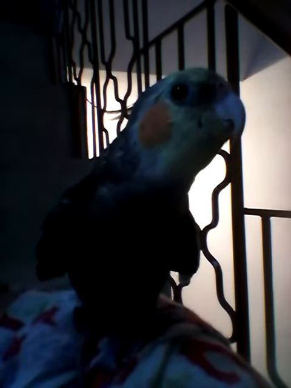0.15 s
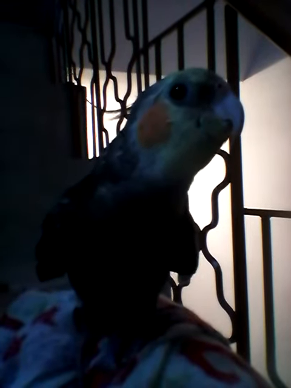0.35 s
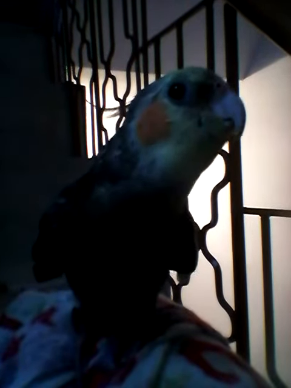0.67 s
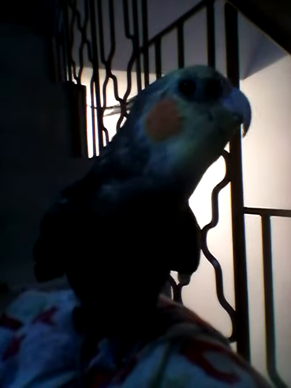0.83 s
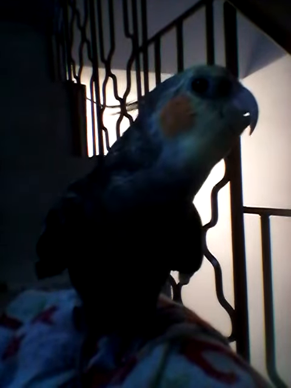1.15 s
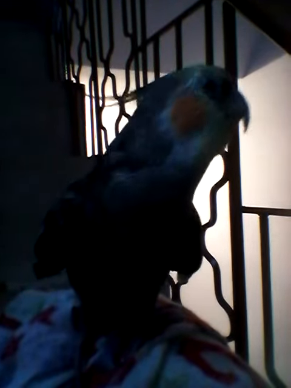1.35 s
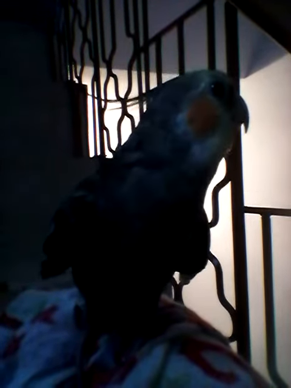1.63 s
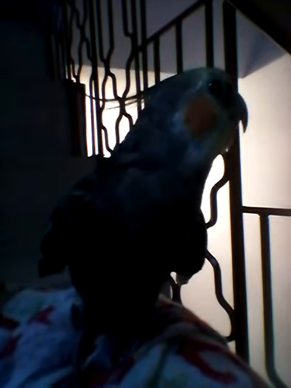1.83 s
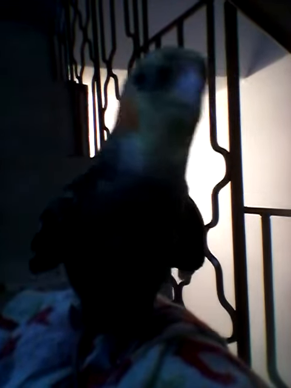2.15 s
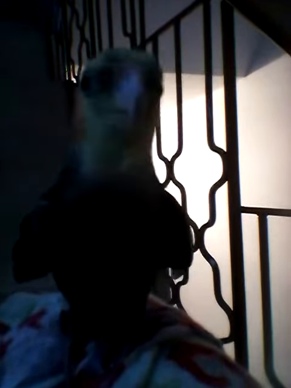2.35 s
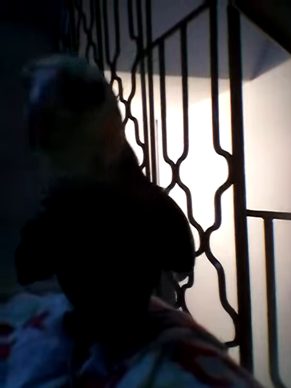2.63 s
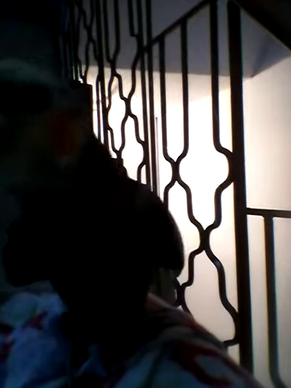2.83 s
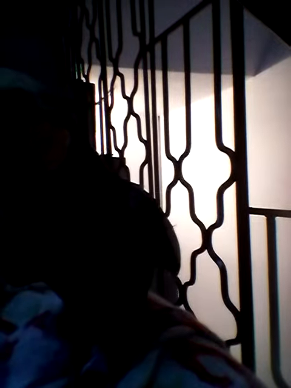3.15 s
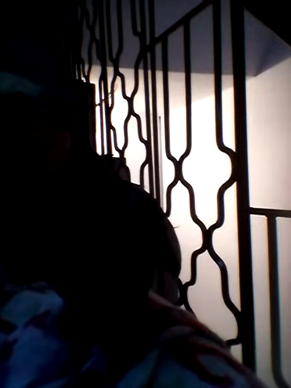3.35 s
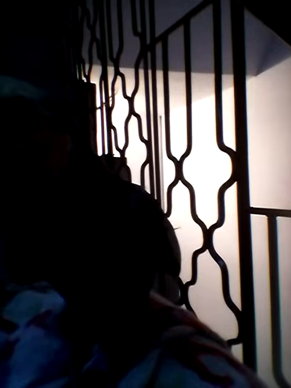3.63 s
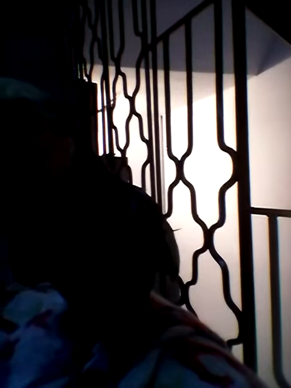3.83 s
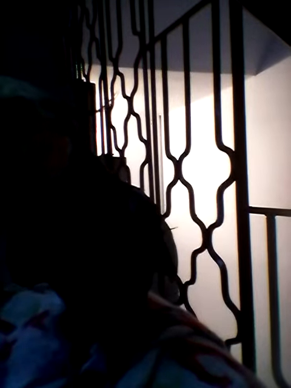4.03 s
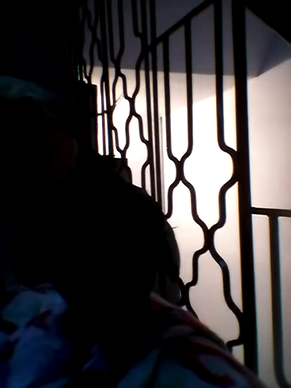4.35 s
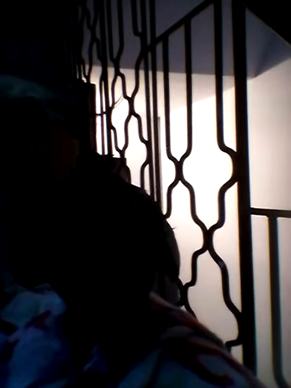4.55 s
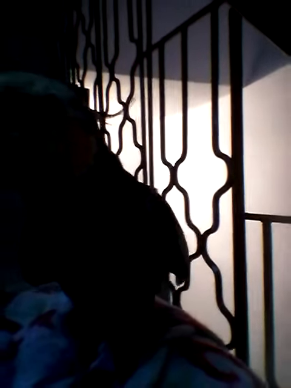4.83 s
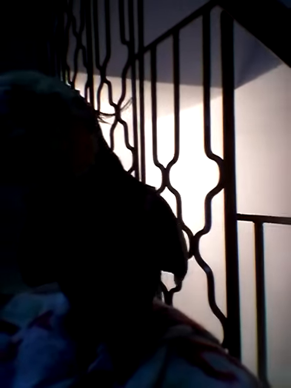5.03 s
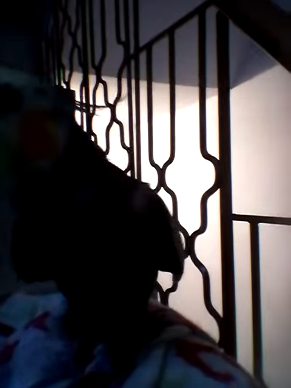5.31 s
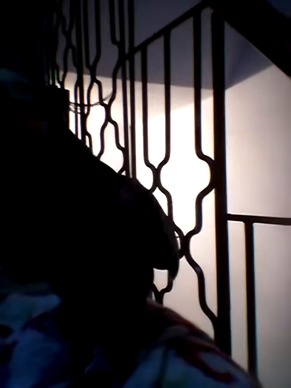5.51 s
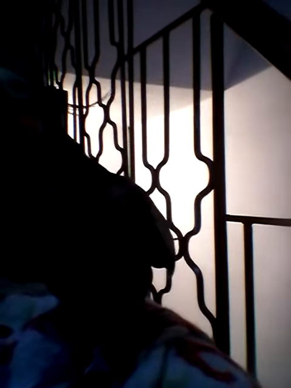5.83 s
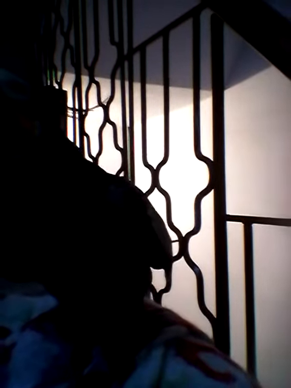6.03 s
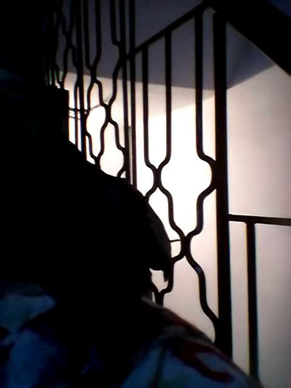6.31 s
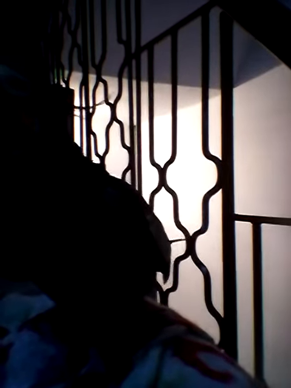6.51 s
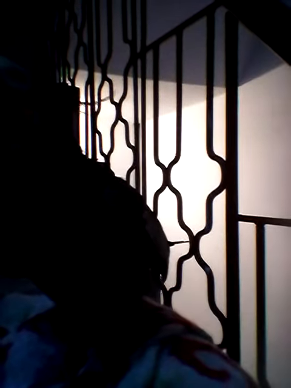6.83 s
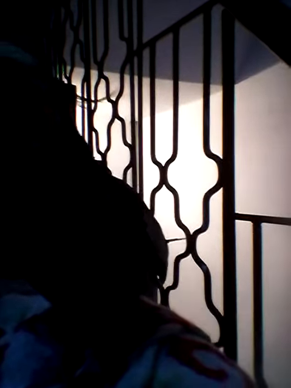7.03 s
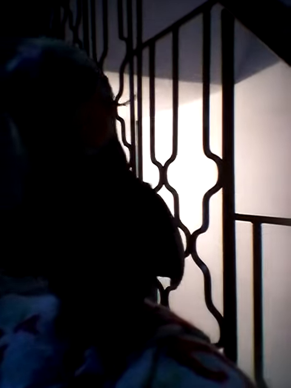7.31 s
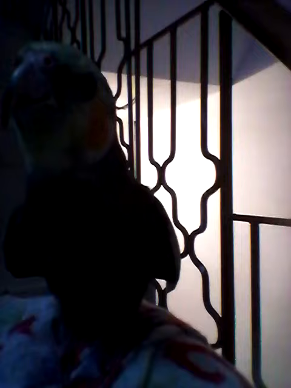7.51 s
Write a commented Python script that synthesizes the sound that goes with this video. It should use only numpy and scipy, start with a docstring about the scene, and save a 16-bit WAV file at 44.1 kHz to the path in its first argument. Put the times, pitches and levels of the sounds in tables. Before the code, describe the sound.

A constant low-level hiss, thin in the bass, fills a hard, echoing stairwell. At 0.7 s a cockatiel close to a small microphone whistles a clear note, sweeping up fast and holding about a quarter second with a wavering, flickering level. A quick rising chirp follows at 1.15 s, then a slightly higher held note from 1.4 to 1.75 s. Near 1.9 s come two faint thin squeaks, a chirp and a brief bright wash of noise. Chirps at 2.2, 2.5 and 2.8 s swoop up and hook down. Two lower, softer held notes run from 3.05 to 3.8 s. Echoes fade into hiss until 5.05 s, when a held note starts a second run: chirp at 5.5, a higher held note at 5.8, chirps at 6.3, 6.55 and 6.8, and a strong held note from 7.1 to 7.5 s. Airy puffs mark many openings; the loudest notes sound slightly overloaded.

```python
"""A steady hiss fills a hard-walled stairwell; from 0.67 s a cockatiel whistles close to a small microphone.
Notes are near sines with weak overtones and half-pitch lines: first a held one, from 1.15 s short rising chirps too.
Puffs of noise join many openings, and the walls answer with dying echoes. Two thin squeaks come near 1.9 s, with
a bright wash of noise around the second. After a gap near 4 s more notes follow, until about 7.5 s. The
microphone port resonates on the hiss, and the loudest notes overload the input."""
import sys
import numpy as np
from scipy import signal
from scipy.fft import rfft, irfft
from scipy.io import wavfile
from scipy.ndimage import uniform_filter1d

SR = 44100
rng = np.random.default_rng(int(sys.argv[2]) if len(sys.argv) > 2 else 0)


def linear_from_db(decibels):
    """Turn decibels (scalar or array-like) into linear amplitude factors; 0 gives 1."""
    return 10 ** (np.asarray(decibels, float) / 20)


def generate_wav(signal):
    """Clip the signal to [-1, 1] and save it as 16-bit WAV at the path in sys.argv[1]."""
    frames = np.transpose(np.atleast_2d(signal))
    scaled = np.clip(frames, -1, 1) * 32767
    pcm = np.round(scaled).astype(np.int16)
    wavfile.write(sys.argv[1], SR, pcm)


N = 338247   # length in samples
EDGE_S = 0.005   # a note swells in and stops within this time


def rms_one(x):
    """Scale to rms 1."""
    return x / np.sqrt(np.mean(x ** 2) + 1e-20)


def at_hz(points, hz):
    """Read a table of frequency and value, evenly spaced in octaves between its points."""
    table_hz, values = np.transpose(points)
    return np.interp(np.log(hz), np.log(table_hz), values)


def drift(rate_hz, count):
    """Slow random wandering of spread 1: white noise twice through a one-pole low-pass."""
    r = np.exp(-2 * np.pi * rate_hz / SR)
    noise = rng.standard_normal(count + 4000)
    settled = signal.lfilter([1], [1, -2 * r, r * r], noise)[4000:]
    return rms_one(settled)


def resonance(x, hz, width_hz):
    """Two-pole band-pass with gain 1 on top."""
    r = np.exp(-np.pi * width_hz / SR)
    poles = [1, -2 * r * np.cos(2 * np.pi * hz / SR), r * r]
    return signal.lfilter((1 - r * r) / 2 * np.array([1, 0, -1]), poles, x)


# Tone colour of the house hiss before the microphone.
# Each row: frequency in Hz, density in dB per Hz relative to the other rows.
HISS_COLOUR = [(60, -17), (120, -4), (200, -11), (350, 4), (700, -1.5), (1300, -5.5), (2300, -13.5),
               (4200, -15.5), (5500, -14), (6900, -12), (7400, -22), (9700, -25.5), (11000, -15),
               (15500, -23)]


def hiss():
    """Broadband noise of the house: white noise shaped in frequency, its level wandering slightly."""
    hz = np.maximum(np.arange(N // 2 + 1) * SR / N, 1)
    spectrum = rfft(rng.standard_normal(N)) * linear_from_db(at_hz(HISS_COLOUR, hz))
    steady = irfft(spectrum, N)
    level_db = -49 + 0.13 * drift(1.0, count=N)
    return linear_from_db(level_db) * rms_one(steady)


def shaped(start, low_hz, bend, steady, fall_hz):
    """Rows (s, Hz, dB) of a whole note: soft opening, bending rise, steady part, closing hook."""
    open_s, open_db, linger_below_hz = 0.017, -17.5, 1900   # the syrinx starts soft, lingers on a low opening
    swell = 1.22   # level follows the rise in pitch
    fall_s, fall_db = 0.018, -8.5   # the closing hook
    (top_s, top_hz, top_db), (end_s, end_hz, end_db) = steady[0], steady[-1]
    u = np.linspace(0, 1, 12, endpoint=False)
    span_hz = max(top_hz - low_hz, 1)
    left = (1 - u) ** bend   # share of the rise still to come
    linger_s = open_s * np.clip((linger_below_hz - low_hz) / 300, .1, 1)
    lift_s = min(start + linger_s, top_s - EDGE_S)
    rise_hz = top_hz - left * span_hz
    rise_db = top_db + open_db * left ** swell * np.sqrt(span_hz / 700)   # wide rises start softer
    rise = np.transpose([lift_s + u * (top_s - lift_s), rise_hz, rise_db])
    hook = [(end_s + fall_s * v, end_hz - fall_hz * v * v, end_db + fall_db * v) for v in (.5, 1)]
    return [(start, low_hz, rise[0, 2] - 10), *rise, *steady, *hook]


# Second partial before the beak. Each row: pitch in Hz, level over the fundamental in dB.
SECOND_PARTIAL = [(1500, -26.5), (1750, -19.5), (2050, -19.5), (2200, -33.5), (2350, -35.5), (2480, -36.5),
                  (2600, -28), (2800, -32), (3100, -27.5)]
# Third to ninth partial before the beak. One number each: level over the fundamental in dB.
UPPER_PARTIALS = [-30.5, -40, -41.5, -47, -42, -41, -41.5]
# How strongly the beak passes the overtones. Each row: frequency in Hz, gain in dB.
BEAK_GAIN = [(3000, 2), (4000, -3), (5200, -9), (6100, -12.5), (6800, -27.5), (7600, -18.5), (8600, -9),
             (10000, 0), (12000, -5), (14000, -1.5), (16000, -4)]
# Tone colour of the half-pitch lines. Each row: frequency in Hz, gain in dB.
HALF_LINE_GAIN = [(800, -22), (1000, -20), (1250, -6.5), (1550, -20), (2450, -2.5), (3000, -17.5),
                  (3750, -13), (4050, -27), (4600, -25.5), (6500, -26)]


def note(rows, half_db, rasp_db, overtones_db):
    """One whistled note: partials on a wavering pitch, with half-pitch lines where every second cycle differs."""
    jitter, shimmer_db = 0.0033, 2.0   # spread of the pitch as a share, of the slow flicker in dB
    low_reedy_db_per_oct = 12.5   # lower notes carry stronger upper partials
    half_held_db, half_fades = -52, 0.29   # half-pitch lines once the top is reached; curve toward it
    s, *columns = np.transpose(rows)
    t = np.arange(int(s[0] * SR), int(s[-1] * SR)) / SR
    # rounding the corners of the pitch and level lines
    hz, first_db = [uniform_filter1d(np.interp(t, s, c), size=260, mode="nearest") for c in columns]
    second_db = first_db + at_hz(SECOND_PARTIAL, hz) + overtones_db
    reedy_db = overtones_db + low_reedy_db_per_oct * np.log2(2500 / hz.max())
    climb_left = (hz.max() - np.maximum.accumulate(hz)) / (hz.max() - hz[0] + 1)
    half_db = half_held_db + (half_db - half_held_db) * climb_left ** half_fades
    wavering_hz = hz * (1 + jitter * drift(77.0, count=len(t)))
    phase = 2 * np.pi * np.cumsum(wavering_hz) / SR

    tone = linear_from_db(first_db) * np.sin(phase)
    second_db = second_db + at_hz(BEAK_GAIN, 2 * hz) + 2.6 * drift(40.0, count=len(t))
    tone += linear_from_db(second_db) * np.sin(2 * phase)
    for k, upper_db in enumerate(UPPER_PARTIALS, start=3):
        uneven_db = shimmer_db * drift(25.0, count=len(t)) + 4.5 * drift(300.0, count=len(t))
        partial_db = first_db + reedy_db + upper_db + uneven_db + at_hz(BEAK_GAIN, k * hz)
        in_range = k * hz < .45 * SR
        tone += linear_from_db(partial_db) * in_range * np.sin(k * phase)
    for multiple in (0.5, 1.5, 2.5):   # the half-pitch lines are randomly uneven in level
        uneven_db = 6.0 * drift(25.0, count=len(t))
        line_db = half_db + at_hz(HALF_LINE_GAIN, multiple * hz) + uneven_db
        tone += linear_from_db(line_db) * np.sin(multiple * phase)

    # turbulence shakes the airflow: noise skirts on each partial
    tone *= 1 + linear_from_db(rasp_db) * drift(420.0, count=len(t))
    edges = np.clip(np.minimum(t - t[0], t[-1] - t) / EDGE_S, 0, 1)
    return int(s[0] * SR), np.sqrt(2) * tone * edges


def sing(calls):
    """Whistle each call and lay it in its place."""
    out = np.zeros(N)
    for call in calls:
        start, tone = note(*call)
        out[start:start + len(tone)] += tone
    return out


# Held notes. Each row: start in seconds, opening pitch in Hz, bend of the rise
# (above 1 it slows toward the top), closing fall in Hz.
HELD_NOTES = [(0.666, 1539, 0.57, 30), (1.412, 1830, 1.6, 738), (3.045, 1463, 0.96, 150),
              (3.312, 1508, 1.1, 30), (5.05, 1640, 1.1, 30), (5.795, 1800, 1.5, 425),
              (7.116, 1604, 1.7, 420)]
# Their steady parts, one list a note; the level dips briefly here and there.
# Each row: time in seconds, pitch in Hz, level in dB.
HELD_STEADY = [
    [(0.722, 2380, -7), (0.76, 2458, -19), (0.778, 2498, -12.5), (0.82, 2462, -12), (0.83, 2498, -22),
     (0.854, 2386, -27.5), (0.86, 2442, -8), (0.868, 2443, -23.5), (0.876, 2359, -22.5),
     (0.914, 2463, -12.5), (0.98, 2359, -15.5)],
    [(1.455, 2612, -11.5), (1.501, 2658, -14.5), (1.551, 2546, -12.5), (1.563, 2610, -17),
     (1.585, 2575, -6.5), (1.597, 2654, -18.5), (1.659, 2694, -13.5), (1.675, 2568, -9.5),
     (1.699, 2644, -18), (1.721, 2644, -16.5), (1.745, 2660, -7)],
    [(3.07, 1492, -28), (3.086, 1484, -25.5), (3.178, 1663, -25.5), (3.23, 1728, -13), (3.258, 1740, -18.5),
     (3.272, 1725, -14.5), (3.28, 1640, -26.5)],
    [(3.33, 1535, -24), (3.422, 1795, -14), (3.446, 1777, -11.5), (3.47, 1657, -19.5), (3.518, 1728, -13.5),
     (3.55, 1795, -16), (3.59, 1775, -13.5), (3.612, 1692, -22.5), (3.656, 1706, -17.5), (3.73, 1758, -15),
     (3.765, 1758, -21)],
    [(5.102, 2465, -9), (5.12, 2461, -11.5), (5.198, 2403, -9.5), (5.232, 2395, -20), (5.24, 2418, -26),
     (5.248, 2306, -27.5), (5.286, 2382, -11), (5.318, 2387, -12), (5.336, 2490, -9.5), (5.36, 2404, -19)],
    [(5.83, 2621, -9), (5.86, 2871, -9.5), (5.876, 2972, -12.5), (5.894, 3024, -9.5), (5.908, 3074, -27),
     (5.918, 3024, -14.5), (5.998, 3097, -16), (6.008, 3040, -10), (6.044, 3076, -12.5), (6.1, 2981, -10)],
    [(7.165, 2408, -5.5), (7.185, 2510, -3.5), (7.223, 2397, -9), (7.243, 2449, -10.5), (7.259, 2433, -8.5),
     (7.287, 2369, -10.5), (7.345, 2363, -8.5), (7.373, 2454, -17.5), (7.389, 2512, -10), (7.429, 2524, -7),
     (7.47, 2427, -15)],
]
# Their voice. Each row: half-pitch lines at the opening in dB (before their tone colour),
# hoarseness in dB, extra overtones in dB.
HELD_VOICES = [(-43, -33.5, 4), (-30, -41, 3.5), (-40.5, -28, -0.8), (-67, -41, -0.5), (-35, -42, -1),
               (-49.5, -25, 0.4), (-32.5, -43.5, 0)]


def held_notes():
    """The syrinx rises to a pitch and holds it there with a wavering pitch, while brief dips in level are heard."""
    calls = []
    for (start, low_hz, bend, fall_hz), steady, voice in zip(HELD_NOTES, HELD_STEADY, HELD_VOICES):
        calls.append((shaped(start, low_hz, bend, steady, fall_hz), *voice))
    return sing(calls)


# Puffs of air as the syrinx opens. Each row: start in seconds, peak level in dB.
AIR_PUFFS = [(0.67, -30.5), (1.131, -32), (1.393, -38), (2.178, -32.5), (2.452, -29.5), (2.766, -34.5),
             (3.047, -33.5), (5.051, -34.5), (5.504, -33), (5.774, -32), (6.282, -35.5), (6.553, -39.5),
             (6.816, -33.5), (7.098, -32.5)]
# Throat resonances. Each row: centre in Hz, width of each of two passes in Hz, gain in dB
# relative to the other rows.
THROAT = [(1640, 960, 10.5), (2580, 93, 14), (4300, 730, -25)]


def puffs():
    """Turbulent air: noise ringing in the throat resonances, quick to rise and then dying."""
    puff_s = 0.044
    t, air = np.arange(N) / SR, rng.standard_normal(N)
    flow = np.zeros(N)
    for start, db in AIR_PUFFS:
        flow += linear_from_db(db) * np.interp(t, [start, start + 0.37 * puff_s, start + puff_s], [0, 1, 0])
    throat = np.zeros(N)
    for hz, width_hz, db in THROAT:
        once = resonance(air, hz, width_hz)
        throat += linear_from_db(db) * resonance(once, hz, width_hz)
    return flow * rms_one(throat)


# How long the walls ring. Each row: frequency in Hz, time to die by 60 dB in seconds.
WALL_RING = [(1000, 0.67), (2500, 0.57), (5000, 0.97), (10000, 0.23)]


def stairwell(x):
    """Dense echoes: bands of noise, each dying at its own rate after the first wall is reached."""
    wall_db, first_echo_s = -8.5, 0.0086
    t = np.arange(int(1.5 * SR)) / SR
    echoes = np.zeros(len(t))
    edges_hz = [300, 1400, 2000, 2800, 4000, 5600, 8000, 11000, 18000]
    for low, high in zip(edges_hz, edges_hz[1:]):
        band_pass = signal.butter(2, [low, high], "band", fs=SR, output="sos")
        band = signal.sosfilt(band_pass, rng.standard_normal(len(t)))
        t60 = at_hz(WALL_RING, np.sqrt(low * high))
        even_out = np.sqrt(t60 * SR / (2 * np.log(1000)))   # long and short rings get equal energy
        echoes += band * linear_from_db(-60 * t / t60) / even_out
    return linear_from_db(wall_db) * signal.fftconvolve(x, echoes * (t > first_echo_s))[:N]


# Short chirps. Each row: start in seconds, rise in seconds, opening pitch in Hz, top pitch in Hz,
# peak level in dB, closing fall in Hz.
SHORT_CHIRPS = [(1.153, .045, 1988, 2600, -10, 294.5), (1.94, .052, 1690, 2312, -11, 723),
                (2.185, 0.065, 1637, 2335, -8.5, 660), (2.471, .062, 1756, 2270, -16, 487),
                (2.763, .066, 1583, 2219, -11, 487), (5.533, 0.05, 2080, 2790, -8.5, 78.7),
                (6.295, .062, 2297, 2864, -6.5, 223.5), (6.565, 0.06, 1658, 2450, -9.5, 139),
                (6.828, .055, 1591, 2162, -9, 30)]


def chirps():
    """Quick rises that slow toward the top, the more the higher they open, then a short hold and a hook."""
    bend_at_1600_hz, bend_grows = 1.3, 2.7
    hold_s, sag_db = 0.014, -2
    half_at_1600_hz_db, rasp_db = -32.5, -32
    half_loss_db_per_oct = 39   # chirps that open higher double their period less
    brightens = 1   # overtones gain this many dB more than the fundamental for each dB of effort
    calls = []
    for start, rise_s, low_hz, top_hz, db, fall_hz in SHORT_CHIRPS:
        bend = bend_at_1600_hz * (low_hz / 1600) ** bend_grows
        top_s = start + rise_s
        steady = [(top_s, top_hz, db), (top_s + hold_s, top_hz, db + sag_db)]
        half_db = half_at_1600_hz_db - half_loss_db_per_oct * np.log2(low_hz / 1600)
        calls.append((shaped(start, low_hz, bend, steady, fall_hz), half_db, rasp_db, brightens * (db + 11)))
    return sing(calls)


# Two thin squeaks, one list each. Each row: time in seconds, pitch in Hz, level in dB.
THIN_SQUEAKS = [
    [(1.85, 3140, -37.5), (1.876, 3156, -34.5), (1.89, 3130, -39.5)],
    [(1.893, 4130, -42.5), (1.905, 3277, -36.5), (1.918, 2854, -35.5), (1.96, 2960, -37.5),
     (1.975, 2860, -58)],
]
# Their voice. Each row: extra overtones in dB, hoarseness in dB.
SQUEAK_VOICES = [(0.1, -30), (22, -1)]


def squeaks():
    """Two soft, hoarse whistles that follow their own pitch lines; their half-pitch lines soon sit at the
    common level every note reaches at its top."""
    calls = []
    for rows, (overtones_db, rasp_db) in zip(THIN_SQUEAKS, SQUEAK_VOICES):
        calls.append((rows, -90, rasp_db, overtones_db))
    return sing(calls)


# When the bright wash is heard. One row: start in seconds, length in seconds.
WASH_TIME = (1.88, .16)
# How it sounds. One row: level in dB at the peak, before the bass is removed, and lowest frequency in Hz.
WASH_SOUND = (-46.5, 2995)


def bright_wash():
    """A bright wash around the second squeak: high-passed noise, quick to rise and slow to die."""
    (start_s, length_s), (db, low_hz) = WASH_TIME, WASH_SOUND
    level = np.interp(np.arange(N) / SR, [start_s, start_s + 0.12 * length_s, start_s + length_s], [0, 1, 0])
    high_pass = signal.butter(2, low_hz, "high", fs=SR, output="sos")
    noise = signal.sosfilt(high_pass, rng.standard_normal(N))
    return linear_from_db(db) * level * noise


def scene():
    """Bird and bright wash, their echoes, and the hiss."""
    bird = held_notes() + puffs() + chirps() + squeaks()
    near = bird + bright_wash()
    return (near + stairwell(near) + hiss())[None]


def roll_off(x):
    """The treble ends steeply here."""
    return signal.sosfilt(signal.butter(12, 15770, fs=SR, output="sos"), x)


def record(dry):
    """Port resonance with the treble falling away above it, amplifier hiss, bass cut and hard overload."""
    port_hz, port_width_hz = 6752, 294
    amplifier_hiss_db, bass_cut_hz, overload = -60.5, 210, 0.69   # overload: the level it flattens toward
    r, w = np.exp(-np.pi * port_width_hz / SR), 2 * np.pi * port_hz / SR
    poles = [1, -2 * r * np.cos(w), r * r]
    through_port = signal.lfilter([sum(poles)], poles, dry)
    amplified = through_port + linear_from_db(amplifier_hiss_db) * rng.standard_normal(dry.shape)
    thin = signal.sosfilt(signal.butter(4, bass_cut_hz, "high", fs=SR, output="sos"), amplified)
    mix = thin / (1 + np.abs(thin / overload) ** 14.0) ** (1 / 14.0)
    return roll_off(mix)


dry = scene()
out = record(dry)
generate_wav(out)
```